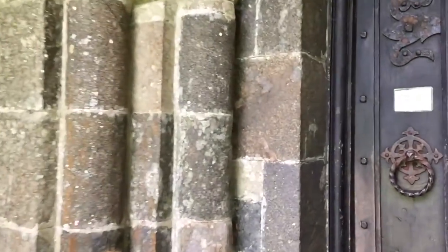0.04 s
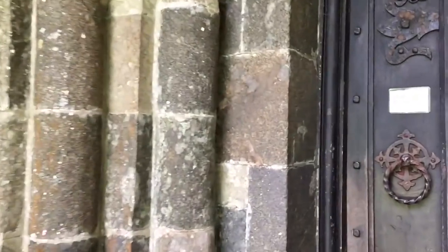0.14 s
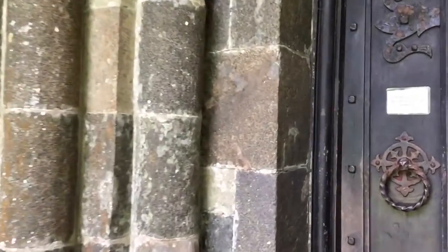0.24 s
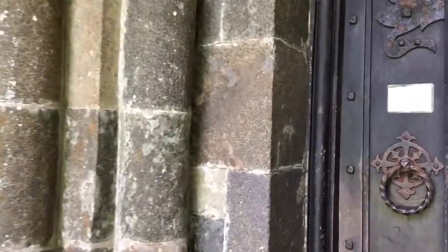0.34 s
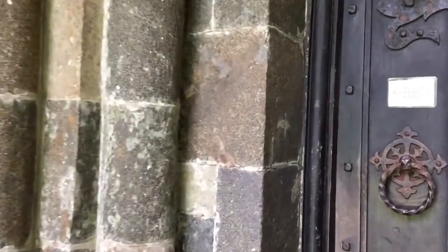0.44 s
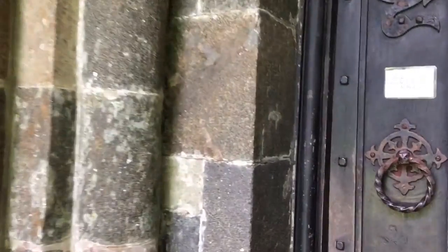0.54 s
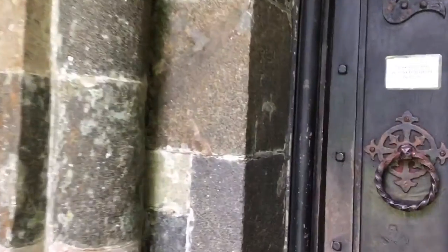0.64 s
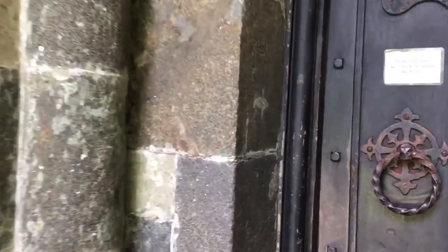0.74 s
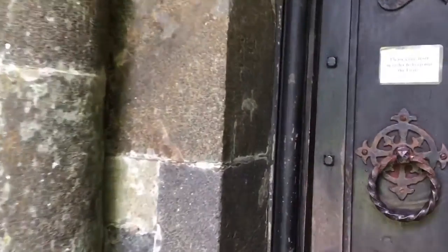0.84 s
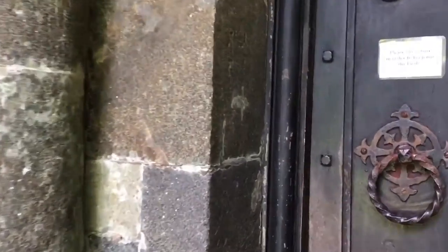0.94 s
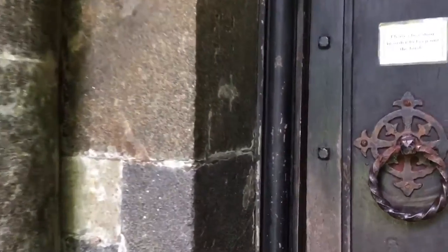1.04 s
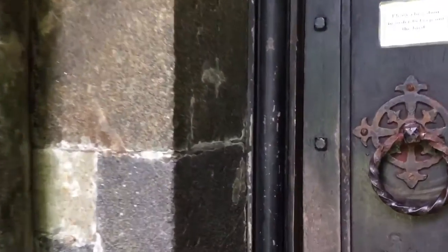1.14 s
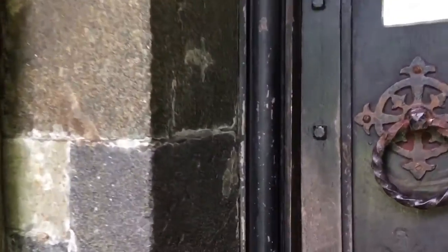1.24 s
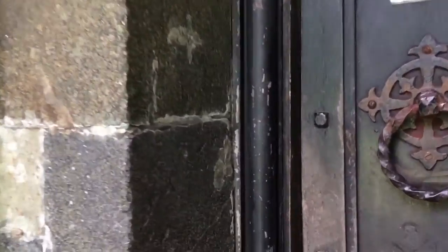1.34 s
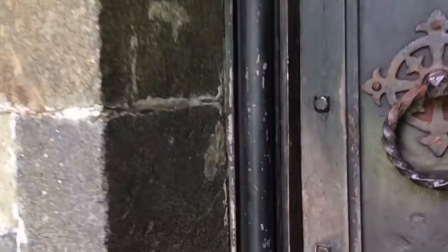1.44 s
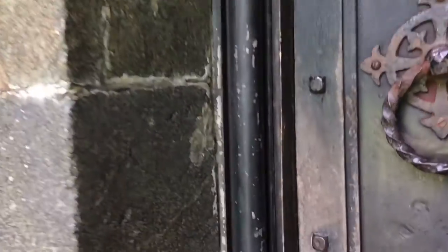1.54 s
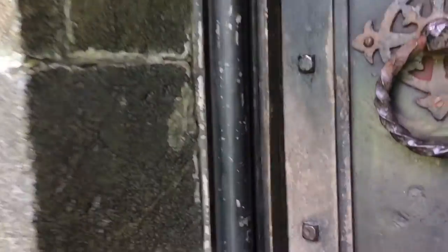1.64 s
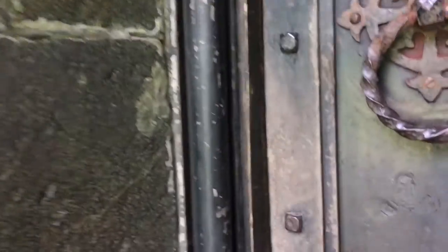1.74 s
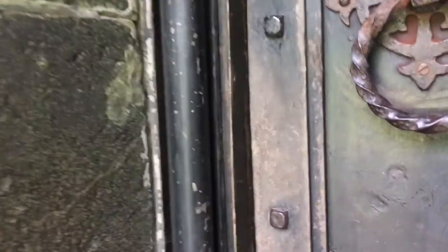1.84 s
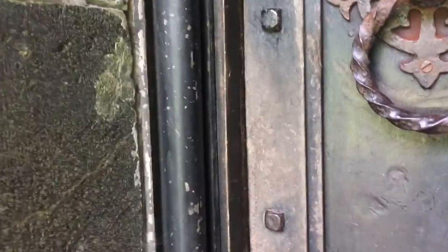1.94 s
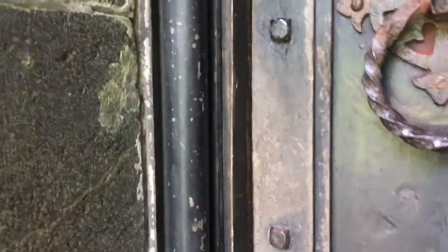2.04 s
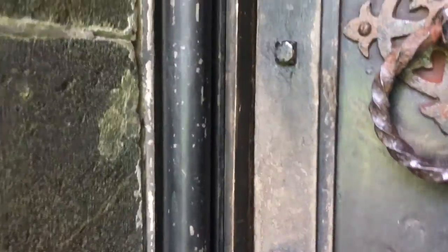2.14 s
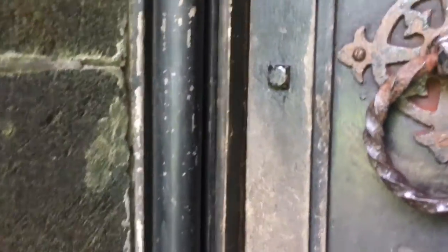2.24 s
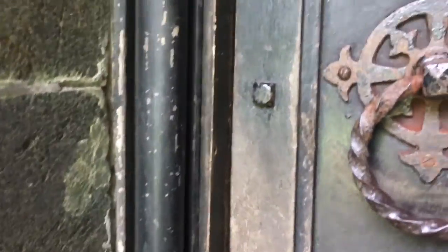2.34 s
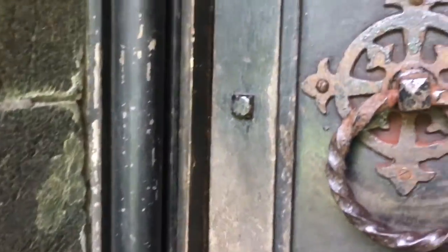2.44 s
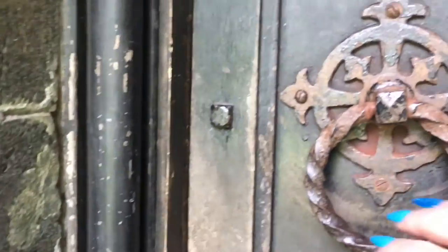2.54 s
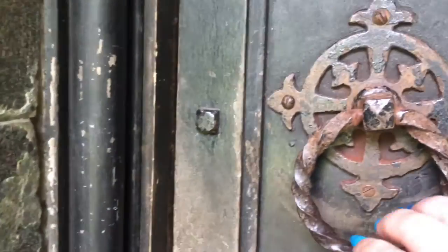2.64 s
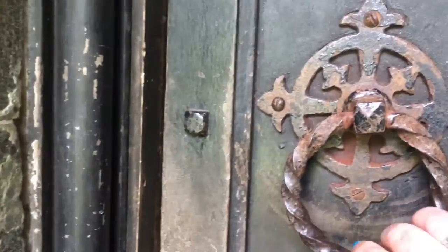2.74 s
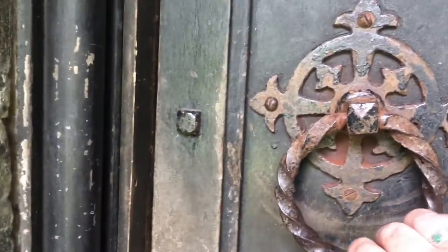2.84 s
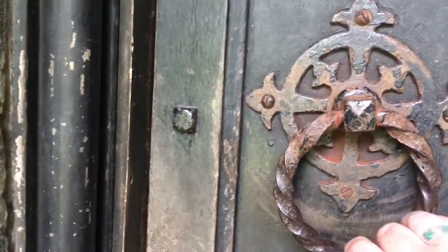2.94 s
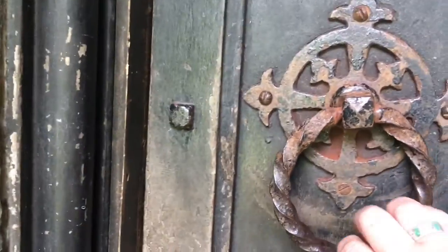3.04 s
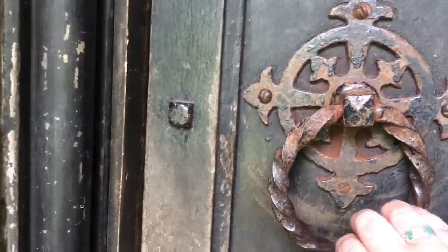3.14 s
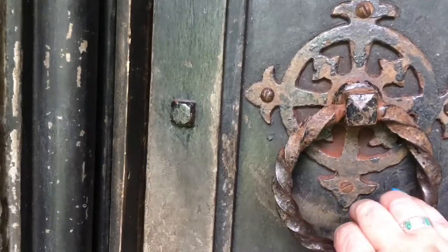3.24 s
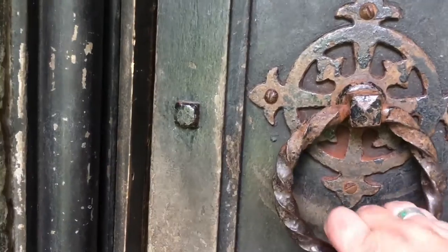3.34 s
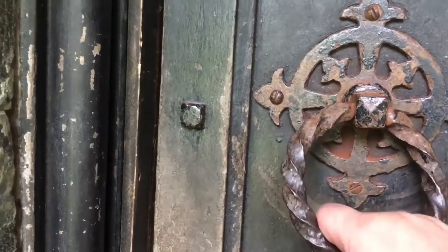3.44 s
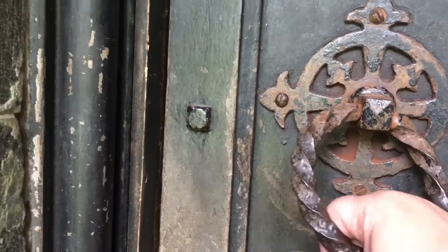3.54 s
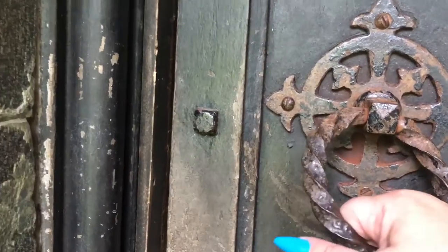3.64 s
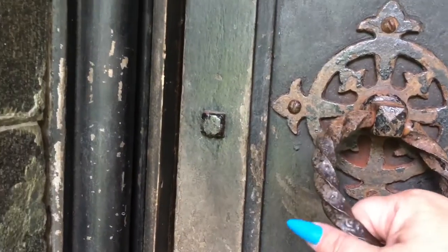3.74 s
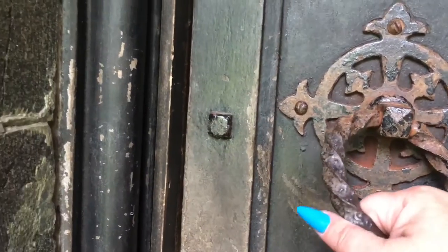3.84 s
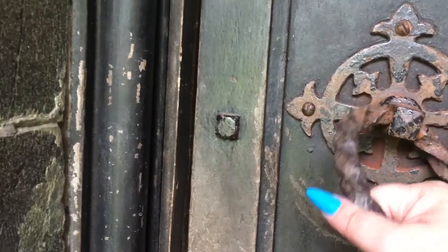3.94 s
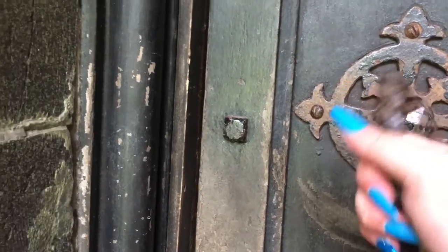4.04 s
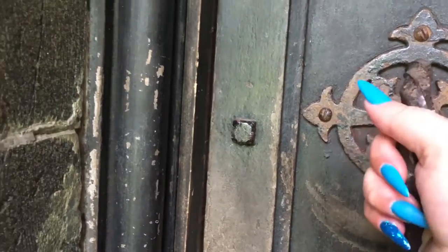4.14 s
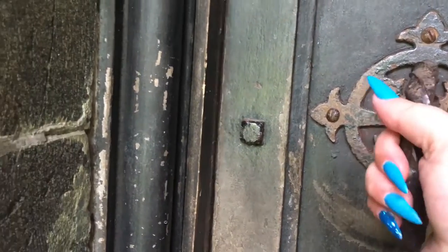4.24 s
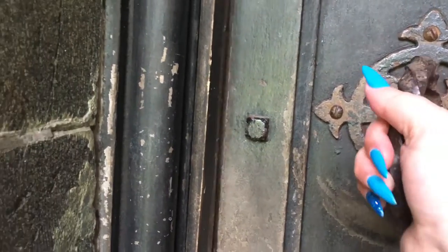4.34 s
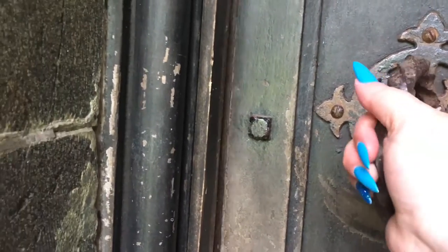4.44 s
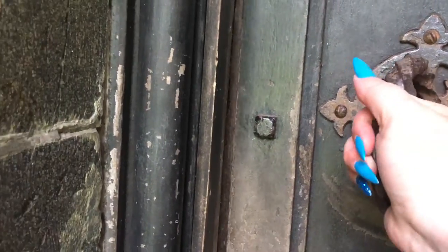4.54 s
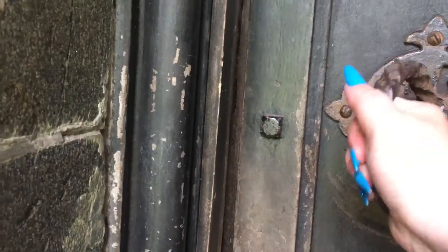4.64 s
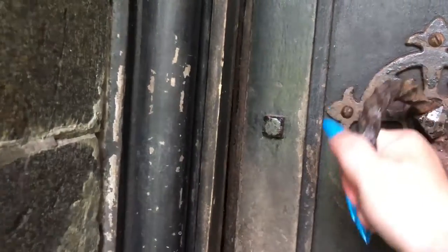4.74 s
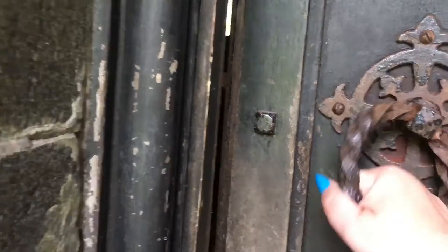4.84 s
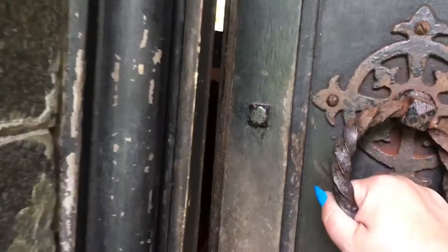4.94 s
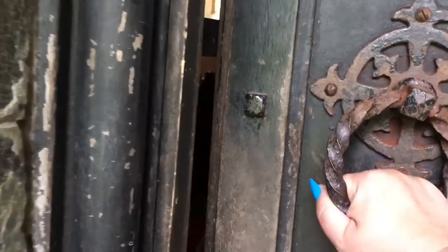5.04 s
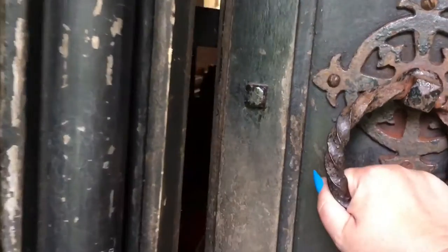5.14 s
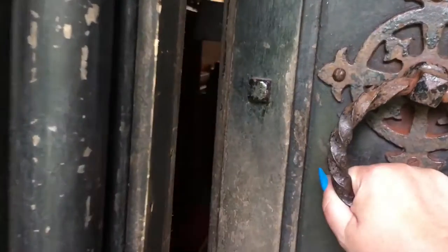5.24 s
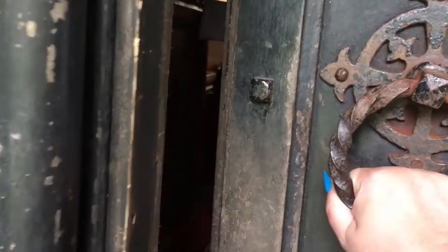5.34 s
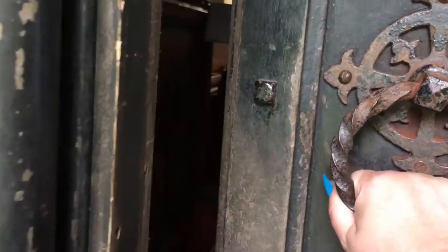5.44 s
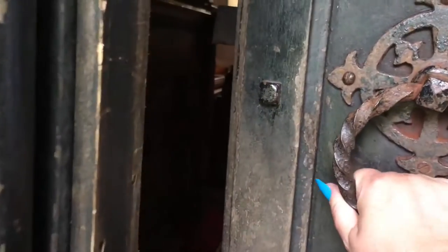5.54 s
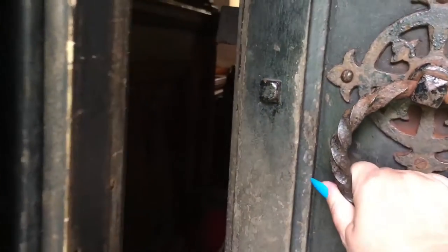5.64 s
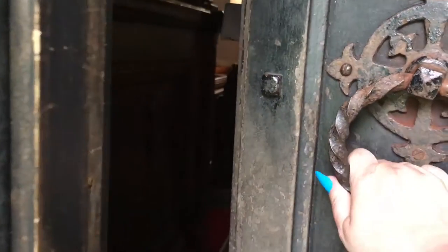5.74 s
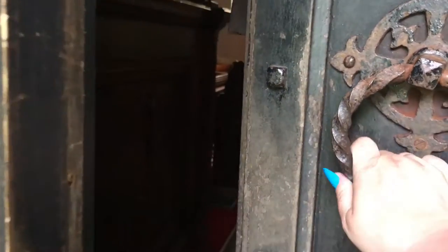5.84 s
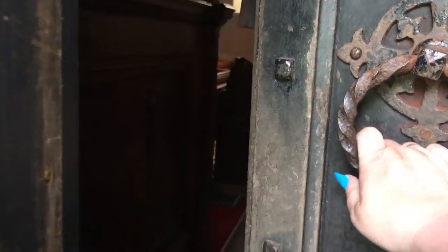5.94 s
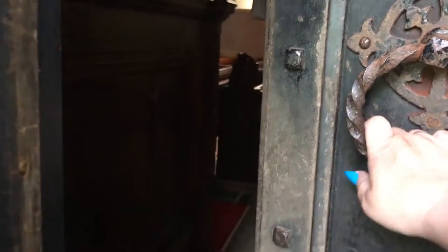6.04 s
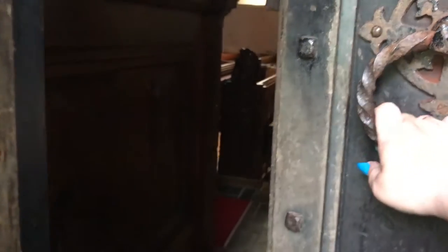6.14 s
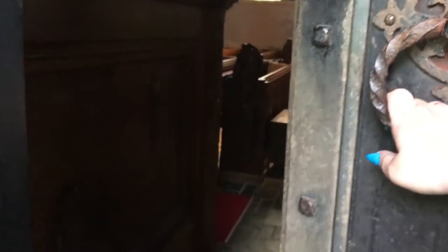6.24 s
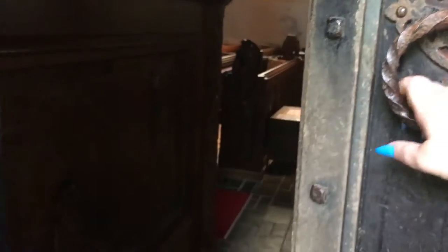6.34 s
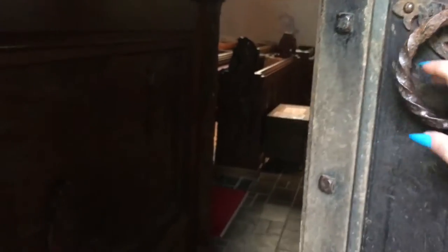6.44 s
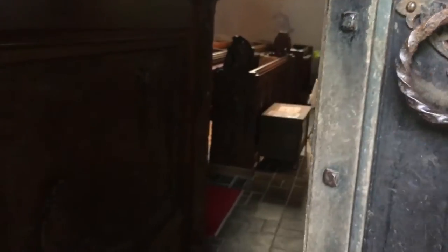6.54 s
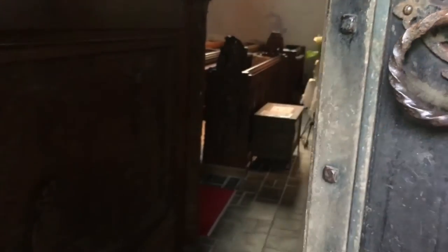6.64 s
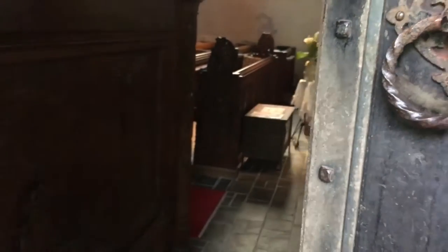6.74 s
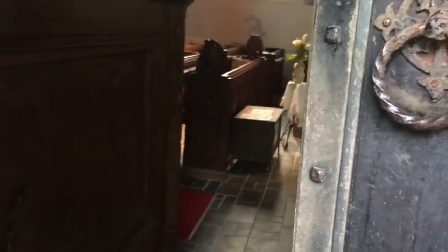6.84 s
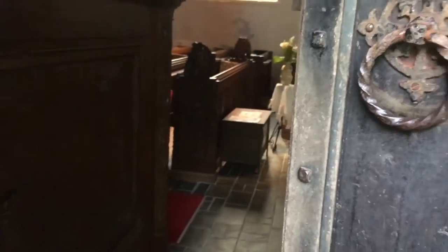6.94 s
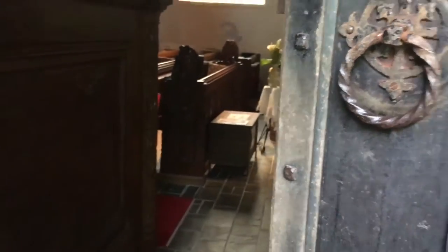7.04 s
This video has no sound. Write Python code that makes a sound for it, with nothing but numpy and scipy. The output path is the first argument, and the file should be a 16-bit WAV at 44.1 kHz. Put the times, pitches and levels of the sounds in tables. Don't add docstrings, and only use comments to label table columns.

```python
import sys
import numpy as np
from scipy import signal
from scipy.fft import rfft, irfft
from scipy.io import wavfile
from scipy.ndimage import uniform_filter1d

SR = 44100
rng = np.random.default_rng(int(sys.argv[2]) if len(sys.argv) > 2 else 0)


def generate_wav(signal):
    frames = np.transpose(np.atleast_2d(signal))
    scaled = np.clip(frames, -1, 1) * 32767
    pcm = np.round(scaled).astype(np.int16)
    wavfile.write(sys.argv[1], SR, pcm)


def elevation(decibels):
    levels = np.asarray(decibels, float)
    return 10 ** (levels / 20)


N = 312669


def rms_one(x):
    return x / np.sqrt(np.mean(x ** 2) + 1e-20)


def at_hz(points, hz):
    table_hz, values = np.transpose(points)
    return np.interp(np.log(hz), np.log(table_hz), values)


def band(x, low_hz, high_hz):
    return signal.sosfilt(signal.butter(2, [low_hz, high_hz], "band", fs=SR, output="sos"), x)


def add(out, start_s, sound):
    i = round(start_s * SR)
    out[i:i + len(sound)] += sound[:N - i]


def sine(hz):
    return np.sin(2 * np.pi * np.cumsum(hz, axis=-1) / SR)


def tail(x, t60_s, cut_hz):
    t = np.arange(round(SR * 0.8)) / SR
    onset = np.minimum(t / 0.016, 1)
    echoes = band(rng.standard_normal(len(t)), 80, cut_hz) * elevation(-60 * t / t60_s) * onset
    return signal.fftconvolve(x, echoes / np.sqrt(np.sum(echoes ** 2)))[:N]


def swells():
    # t/s, length/s, f/Hz, level/dB
    hums = [(0, 0.069, 18.6, -40), (0.101, 0.27, 48, -54), (0.602, 0.35, 28, -48),
            (1.098, 0.29, 25.6, -44.5), (1.2, 0.24, 51, -64), (1.497, 0.28, 27.5, -50),
            (1.8, 0.6, 52, -48.5), (2.349, 0.42, 61, -58), (2.496, 0.44, 29.5, -52.5),
            (2.649, 0.55, 55, -54.5), (3.35, 0.44, 56, -56.5), (3.498, 0.2, 26, -48.5),
            (4.015, 0.055, 12, -29), (4.04, 0.41, 48, -41.5), (4.214, 0.177, 25.2, -43),
            (4.12, 0.29, 140, -61), (1.781, 0.17, 72, -58), (4.599, 0.26, 24, -45.5),
            (4.851, 0.49, 49, -57), (4.951, 0.49, 24.7, -46), (5.551, 1.12, 38.7, -53),
            (6.599, 0.38, 53.6, -55.5)]
    wobble_share = 0.12
    out = np.zeros(N)
    for start_s, length_s, hz, db in hums:
        t = np.arange(round(length_s * SR)) / SR
        waver = rms_one(band(rng.standard_normal(3 * SR), 1, 8)[SR:])[:len(t)]
        swell = np.sin(np.pi * t / length_s) ** 2
        add(out, start_s, elevation(db + 3) * swell * sine(hz * (1 + wobble_share * waver)))
    return out


def outdoors():
    rumble_db = (-52, -60.5, -69)
    # t/s, far traffic level/dB, far bird chorus level/dB
    air_levels = [(0, -68.5, -76.5), (.6, -70, -70.5), (1.0, -70, -72), (1.2, -70.5, -68.5),
                  (1.5, -69.5, -69), (1.7, -70, -74.5), (2.1, -71, -82), (3, -70.5, -91), (4, -69.5, -87),
                  (4.6, -67.5, -77.5), (5.2, -66.5, -78), (5.7, -73.5, -76.5), (6.301, -70.5, -74.5),
                  (6.8, -71.5, -73.5), (7.09, -72.5, -76)]
    # f/Hz, density/(dB per Hz)
    air_colour = [(59, -31.5), (100, -6.5), (146, -7.5), (314, -13), (1050, -17.5), (1820, -21),
                  (2020, -24.5), (3510, -30.5), (14800, -36), (15800, -36)]
    t = np.arange(N) / SR
    out = swells()
    for (low_hz, high_hz), db in zip([(12, 35), (41, 58.4), (60, 100)], rumble_db):
        noise = rng.standard_normal(N + SR)
        hum = rms_one(band(band(noise, low_hz, high_hz), low_hz, high_hz)[SR:])
        swing = np.sqrt(np.abs(uniform_filter1d(hum ** 2, size=2000)))
        out += elevation(db) * rms_one(hum / (swing + 0.5))
    colour_db = at_hz(air_colour, np.linspace(1, SR / 2, 2 ** 18 + 1))
    hiss = irfft(rfft(rng.standard_normal(2 ** 19)) * elevation(colour_db))[:N]
    air_s, traffic_db, chorus_db = np.transpose(air_levels)
    traffic = signal.sosfilt(signal.butter(2, 2200, fs=SR, output="sos"), hiss)
    air = elevation(np.interp(t, air_s, traffic_db)) * traffic + elevation(-70) * (hiss - traffic)
    chorus = rms_one(band(rng.standard_normal(N), 2300, 4200))
    return out + air / np.std(band(hiss, 180, 1500)) + elevation(np.interp(t, air_s, chorus_db)) * chorus


def songs():
    # t/s, level/dB
    trill_notes = [
        (.05, -83),
        (.15, -82),
        (0.28, -67),
        (.395, -66),
        (0.486, -63.5),
        (.626, -66),
        (0.751, -66),
        (.879, -62),
    ]
    # t/s, length/s, top f/Hz, end f/Hz, level/dB
    chirps = [(1.5, 0.09, 4100, 2700, -74), (6.27, .13, 4600, 2800, -68), (6.445, 0.094, 4300, 2800, -65),
              (6.626, 0.08, 3400, 2700, -64.5), (6.764, .085, 4900, 2950, -65.5),
              (7.004, 0.045, 4300, 3900, -69), (6.27, .07, 5000, 4200, -75), (6.44, .06, 4800, 4000, -72),
              (6.62, .08, 4500, 3900, -76), (6.79, .07, 3900, 2900, -72), (6.5, .07, 3300, 2600, -72),
              (7.01, .06, 3500, 2600, -72)]
    # t/s, length/s, start f/Hz, end f/Hz, level/dB
    far_notes = [(1.081, 0.061, 3100, 3290, -63), (1.1, .14, 3630, 3630, -73),
                 (0.931, 0.21, 1865, 1796, -71.5), (1.252, 0.091, 4460, 4480, -69),
                 (1.46, 0.039, 2830, 4190, -64), (1.521, 0.11, 2900, 2104, -69),
                 (4.369, 0.24, 3260, 3357, -74.5), (4.894, 0.44, 7980, 7400, -76),
                 (5.22, 0.077, 3340, 3180, -73), (5.44, 0.091, 3710, 3490, -72),
                 (5.556, .3, 3540, 3380, -70), (5.858, 0.19, 3266, 3176, -69.5),
                 (6.08, 0.19, 3315, 3320, -71), (6.6, 0.089, 4700, 4120, -76),
                 (6.68, 0.097, 1410, 1502, -74), (6.83, 0.12, 1384, 1560, -74.5),
                 (6.2, .06, 3690, 3510, -70.5), (5.87, .3, 3750, 3650, -75), (5.9, .3, 2900, 2850, -75),
                 (1.1, .16, 3150, 3200, -71), (5.72, .15, 1400, 1450, -76), (5.9, .2, 1600, 1550, -75),
                 (6.22, .08, 1500, 1450, -75), (.5, .5, 3500, 3400, -76), (.6, .45, 2850, 2800, -76),
                 (1.13, .12, 3950, 3900, -73)]
    trill_hz, note_s, grows_s_per_s, slide_hz_per_s = 3150, 0.0354, 0.0413, 657
    clear_share = 0.55
    trill = []
    for start_s, db in trill_notes:
        start_hz = trill_hz + 0.442 * slide_hz_per_s * start_s
        end_hz = trill_hz - 0.417 * slide_hz_per_s * start_s
        trill.append((start_s, note_s + grows_s_per_s * start_s, start_hz, end_hz, db))
    return [(*note, clear_share) for note in trill + chirps] + [(*note, 1) for note in far_notes]


def whistles():
    # t/s, f/Hz, level/dB
    pips = [(.36, 4520, -72), (.46, 4580, -72), (.606, 4420, -74), (.745, 4360, -67.5), (.875, 4345, -70),
            (1.03, 4330, -79), (5.189, 4340, -77), (5.295, 4370, -71.5), (5.391, 4370, -64),
            (5.492, 4360, -62.5), (5.6, 4330, -66), (5.68, 4250, -66.5), (5.783, 4336, -64),
            (5.912, 4315, -73)]
    t60_s, wobble_hz, sag_hz_per_s = 0.2, 22, 250
    out, t = np.zeros(N), np.arange(8000) / SR
    for start_s, hz, db in pips:
        wobble, flutter = rms_one(band(rng.standard_normal((2, SR // 2)), 12.7, 150))[:, -len(t):]
        pitch_hz = hz - sag_hz_per_s * t + wobble_hz * wobble
        envelope = elevation(db - 60 * t / t60_s) * np.minimum(t / 0.0044, 1)
        add(out, start_s, envelope * (1 + 0.22 * flutter) * sine(pitch_hz))
    return out


def birds():
    warble_of_pitch, warble_of_slide = 0.065, 0.17
    trees_t60_s = 0.43
    out = whistles()
    for start_s, length_s, start_hz, end_hz, db, share in songs():
        slide_hz = end_hz - start_hz
        depth_hz = share * (warble_of_pitch * end_hz + warble_of_slide * abs(slide_hz))
        t = np.arange(round(length_s * SR)) / SR
        warble = rms_one(band(rng.standard_normal((2, SR)), 39.2, 200))[:, :len(t)]
        throb = elevation(3 * rms_one(band(rng.standard_normal(SR), 10, 40))[-len(t):])
        split = [[0.6], [-0.6]]
        hz = start_hz + slide_hz * t / length_s + depth_hz * (0.4 * warble + split)
        envelope = np.sin(np.pi * t / length_s) ** 0.086
        add(out, start_s, elevation(db - 5) * throb * envelope * sine(hz).sum(0))
    return out + tail(out, trees_t60_s, 13000) * elevation(-4)


def grit():
    # t/s, peak level/dB, below 900 Hz re/dB, 2.3-8.9 kHz re/dB, half length/ms
    scuffs = [(0.0, -45.5, 3, -8, 9.3), (0.141, -53.5, -30, -13, 25), (0.496, -51.5, -10, 0, 28),
              (0.5294, -61, -5, -18, 100), (0.618, -52, -22, -26, 80), (0.769, -48, -7, -12, 34),
              (0.9534, -55, -25, -10, 21), (1.148, -51, 1.5, -15, 36), (1.248, -46, -15, 0, 51),
              (1.2935, -55.5, -7, -34, 61), (1.393, -54.5, -35, 0, 57), (1.736, -44, 5.5, -16, 18.7),
              (1.763, -42.5, -7, -9, 27), (1.819, -58, 3.5, -8, 71), (1.9265, -56.5, 2.5, -8, 80),
              (2.0074, -50.5, 3, -25, 20.5), (2.0294, -63, -16, -17, 47), (5.0973, -46.5, -20, -7, 44),
              (5.128, -50.5, -17, -17.5, 23), (6.379, -60, 5, -17, 35)]
    out = np.zeros(N)
    cracks = rng.standard_normal(N) * elevation(2 * rng.exponential(1, N))
    for start_s, db, low_db, top_db, length_ms in scuffs:
        phase = np.linspace(0, 1, int(length_ms * SR / 500))
        swell = np.minimum(phase / 0.025, 1) * elevation(-26 * phase ** 1.7)
        piece = cracks[round(start_s * SR):][:len(phase)]
        low = elevation(low_db + 3.5) * rms_one(band(piece, 140, 780))
        middle = rms_one(band(piece, 510, 3340))
        top = elevation(top_db - 0.5) * rms_one(band(piece, 2300, 8900))
        add(out, start_s, elevation(db - 11.5) * swell * (low + middle + top))
    return out


def thuds():
    # t/s, peak level/dB, f/Hz, t60/s
    pushes = [(0.241, -72, 96.9, 0.1), (0.533, -47, 125, 0.064), (0.953, -57, 259, 0.16),
              (1.157, -49, 198, 0.098), (1.737, -49, 134, 0.12), (2.005, -55, 91.5, 0.13),
              (3.141, -32.5, 70, 0.038), (3.409, -41.5, 238, 0.24), (3.491, -40, 257, 0.066),
              (3.524, -43.5, 287, 0.12), (3.814, -55, 227, 0.25), (3.962, -29, 187, 0.23),
              (4.008, -38, 212, 0.18), (4.068, -34, 270, 0.2), (4.542, -44, 189, 0.081),
              (4.6588, -32.5, 180, 0.1), (4.797, -45.5, 154, 0.085), (4.847, -44, 232, 0.08),
              (5.316, -43.5, 196, 0.11), (6.413, -47.5, 303, 0.21), (6.74, -54.5, 248, 0.13)]
    out, t = np.zeros(N), np.arange(9000) / SR
    for start_s, db, hz, t60_s in pushes:
        modes = [(1, 1), (0.31, 1.45), (0.28, 0.8)]
        swing = sum(gain * np.sin(2 * np.pi * ratio * hz * t) for gain, ratio in modes)
        add(out, start_s, elevation(db - 3.5 - 60 * t / t60_s) * swing)
    return out


def ticks():
    # t/s, peak level/dB, mode f/Hz, mode f/Hz
    hard_taps = [(0.3566, -41.5, 2360, 4540), (1.765, -35, 4960, 7060), (2.811, -44.5, 3140, 4600),
                 (2.8853, -55, 2850, 4280), (3.116, -57, 2800, 5270), (3.3595, -55, 2660, 3830),
                 (3.414, -48, 2110, 2900), (3.424, -38, 2770, 4460), (3.493, -58, 4830, 6500),
                 (3.518, -46, 2000, 2620), (3.957, -28, 2500, 3300), (3.965, -36, 3180, 8500),
                 (3.9886, -24, 3140, 4880), (4.009, -30, 3300, 1620), (4.0665, -6, 1704, 4330),
                 (4.067, -15, 2600, 3380), (4.110, -30, 3920, 4600), (4.190, -48, 5900, 8004),
                 (4.205, -55, 9000, 12000), (4.251, -43, 4400, 6600), (4.278, -50, 3000, 3500),
                 (4.287, -39.5, 2500, 5020), (4.658, -50, 3860, 6600), (4.672, -40, 2300, 2900),
                 (4.797, -48.5, 3360, 4150), (4.8486, -28, 2220, 3100), (4.879, -31, 3590, 3900),
                 (5.2644, -56, 5500, 11000), (4.886, -39, 3300, 4200), (3.411, -57, 8000, 12000),
                 (4.849, -53, 11000, 14000), (4.0396, -43, 2360, 2100), (4.258, -54, 12000, 15000),
                 (6.3395, -52, 1500, 3600)]
    # t/s, peak level/dB, f/Hz
    snaps = [(3.141, -33.5, 267), (3.141, -33, 1900), (3.141, -30, 7300), (3.9652, -14, 524),
             (3.9693, -20, 700), (4.0672, -10, 800), (4.0645, -13, 450), (4.0652, -9, 1650),
             (4.0672, -9, 1700), (4.0716, -12, 450), (4.8808, -16.5, 1600)]
    tick_t60_s, tick_rise_s = 0.014, 0.00058
    snap_t60_cycles, snap_rise_s = 3.5, 0.00015
    out, t = np.zeros(N), np.arange(1500) / SR
    for start_s, db, *modes_hz in hard_taps:
        pair = sum(np.sin(2 * np.pi * hz * t) for hz in modes_hz)
        grain = sum(band(rng.standard_normal(len(t)), 0.7 * hz, 1.263 * hz) for hz in modes_hz)
        envelope = elevation(db - 9 - 60 * t / tick_t60_s) * (1 - np.exp(-t / tick_rise_s))
        add(out, start_s, envelope * (pair + 3 * grain))
    for start_s, db, hz in snaps:
        envelope = elevation(db - 60 * t * hz / snap_t60_cycles) * np.minimum(t / snap_rise_s, 1)
        add(out, start_s, envelope * np.sin(2 * np.pi * hz * t))
    return out


def scrapes():
    # t/s, length/s, level/dB, low f/Hz, high f/Hz
    drags = [
        (3.99, .03, -34, 350, 1400),
        (4.035, .03, -41, 350, 2400),
        (4.825, .024, -69, 3000, 11000),
        (5.105, .05, -61, 1300, 7000),
        (6.39, .03, -56, 300, 1800),
        (3.41, .016, -50, 300, 1800),
        (4.652, .02, -54, 400, 2500),
    ]
    grows_db, grain_db = 6, 3
    out = np.zeros(N)
    for start_s, length_s, db, low_hz, high_hz in drags:
        slips = rng.standard_normal(4000) * elevation(grain_db * rng.exponential(1, 4000))
        rasp = rms_one(band(band(slips, low_hz, high_hz), low_hz, high_hz))
        phase = np.linspace(0, 1, round(length_s * SR))
        swell = np.sin(np.pi * phase) ** 0.3 * elevation(grows_db * (phase - 1))
        add(out, start_s, elevation(db) * swell * rasp[:len(phase)])
    return out


def clangs():
    # t/s, peak level/dB, f/Hz, t60/ms
    iron_notes = [(2.812, -61, 8650, 60), (2.815, -62, 1000, 80), (3.426, -35, 1052, 83), (3.425, -44, 2713, 85),
                  (3.434, -41, 1400, 76), (3.425, -53, 4500, 66), (3.429, -62, 7900, 80), (3.967, -26, 1330, 70),
                  (3.964, -32, 640, 80), (3.962, -32, 480, 87), (3.97, -38, 3200, 40), (3.990, -35, 4900, 30),
                  (3.991, -43, 6690, 25), (4.066, -9.5, 705, 65), (4.067, -11.5, 810, 75),
                  (4.0655, -11.5, 1670, 55), (4.065, -18, 445, 50), (4.067, -19, 563, 90),
                  (4.068, -18.5, 940, 79), (4.068, -23, 1400, 60), (4.07, -30, 1480, 70), (4.07, -23, 1600, 69),
                  (4.0655, -21, 3020, 40), (4.076, -28, 4370, 60), (4.671, -32, 790, 60), (4.8, -45, 1100, 60),
                  (4.848, -35, 764, 69), (4.85, -52, 6600, 63), (4.88, -26, 594, 93), (4.8795, -22, 1580, 45),
                  (4.877, -25, 450, 60), (4.888, -25, 700, 85), (4.882, -30.5, 996, 106), (4.879, -26, 1900, 68),
                  (4.88, -26, 2430, 41), (4.879, -28.5, 2600, 61), (4.881, -32, 3200, 40),
                  (4.89, -55.5, 5300, 140),
                  (3.958, -32, 3000, 25), (3.974, -31, 1150, 60), (3.9887, -28, 3030, 25),
                (3.995, -33, 1373, 100), (3.996, -34, 781, 150), (4.008, -35, 431, 120),
                (4.009, -39, 3359, 30), (4.0, -34, 1130, 70), (4.043, -34, 781, 100),
                (4.044, -39, 1400, 70), (4.075, -24, 1960, 90), (4.078, -25, 1130, 110),
                (4.1, -29, 1502, 90), (4.105, -31, 398, 200), (4.1, -31, 1949, 90), (4.105, -41, 4737, 40),
                (4.0655, -24, 6374, 35), (4.067, -27, 5582, 35), (4.067, -23, 3850, 35),
                (4.66, -45, 2000, 40), (4.849, -34, 2500, 30), (4.851, -42, 1400, 50),
                (4.85, -48, 5800, 40), (4.908, -40, 398, 80), (4.915, -41, 1200, 70)]
    rise_s, chatter_share, chatter_top_hz = 0.0015, 0.45, 300
    out, t = np.zeros(N), np.arange(9000) / SR
    notes = iron_notes
    shakes = rms_one(band(rng.standard_normal((len(notes), len(t))), 40, chatter_top_hz))
    for (start_s, db, hz, t60_ms), shake in zip(notes, shakes):
        envelope = elevation(db - 1.5 - 60000 * t / t60_ms) * (1 - np.exp(-t / rise_s))
        add(out, start_s, envelope * (1 + chatter_share * shake) * np.sin(2 * np.pi * hz * t))
    return out


def door():
    # t/s, peak level/dB, oak <900 Hz re/dB, top >3 kHz re/dB, ring-on/(0-1.5)
    knocks = [(3.4093, -45.5, 1, -20, 1), (3.4253, -33, -5, -18, 0.8), (3.4942, -51, 7, -21, 1),
              (3.8174, -63.5, 2.5, -11, 1), (3.9572, -28, -4, -14, 1), (3.9641, -23.5, -1, -24, 0.7),
              (3.988, -29, -2, -18, 0.65), (4.0082, -25.5, -3, -17, 1), (4.0644, -8.5, -6.5, -5, .47),
              (4.1074, -33, 0, -22, 0.6), (4.1894, -42.5, -16.5, -5, 0.67), (4.25, -41, -8, 0, 0.5),
              (4.2875, -45, -29, -4, 0.56)]
    swing_knocks = [(4.5407, -66, 8, -10, 0.62), (4.659, -40.5, -9, -18, 0.86), (4.6712, -47, 8, -20, 0.4),
                    (4.796, -35, -3.5, -32, 0.7), (4.8485, -32, -3, -13, 0.6), (4.878, -19, -8, -22, 0.7),
                    (4.8906, -36, -2, -18, 0.9), (4.915, -38, -8, -24, 0.85), (5.3204, -43, 5, -18, 0.4),
                    (6.4145, -46, -5.5, -34, 0.53), (6.433, -48.5, -2, -19.5, 0.32),
                    (6.7409, -61, -5, -10, .65)]
    # t/s, peak level/dB, oak re/dB, top re/dB
    light_taps = [
        (.5277, -50, -9, -12),
        (.636, -46, -18, -7),
        (1.1573, -48, -22, -32),
        (1.2924, -46.5, -28, -18),
        (1.395, -49, -33, -35),
        (3.1412, -53.5, 1, -20),
        (3.517, -45.5, 11, -28),
        (4.4662, -56, -11, -12),
        (6.339, -48.5, -17, -4.5),
    ]
    # f/Hz, level/dB, t60/s
    latch_modes = [(390, -19, 0.2), (543.6, -6, 0.21), (668, -7, 0.38), (693, -7, 0.17), (790, -3.5, 0.1),
                   (960, -15.5, 0.059), (1515, -13.5, 0.22), (1534, -5, 0.16), (2140, -14, 0.16),
                   (2070, -21, 0.23), (2375, -20, 0.14), (2920, -19, 0.21), (3630, -6.5, 0.048),
                   (3850, -34, 0.64), (3900, -30.5, 0.44), (4094, -18, 0.13), (4420, -21, 0.14),
                   (4474, -25.5, 0.18), (4450, -29, 0.19), (4714, -34, 0.16), (4970, -27.5, 0.16),
                   (5870, -37, 0.092), (6600, -31, 0.13), (6800, -22.5, 0.23)]
    # f/Hz, density/(dB per Hz)
    plank_colour = [(59, -53), (100, -21), (438, -3), (614, -8), (682, -2), (808, -8.5), (1310, -5.5),
                    (1690, -9.5), (2370, -11), (4460, -16), (15500, -53.5)]
    # f/Hz, t60/s
    plank_t60 = [(120, 0.93), (500, .2), (2000, 0.3), (6000, 0.17), (14000, 0.18)]
    rattle_ms, tap_ms, tap_ring = 6.3, 1.9, 0.61
    edges_hz = 100 * 2 ** np.arange(0, 7.4, 0.33)
    band_hz = np.sqrt(edges_hz[1:] * edges_hz[:-1])
    out, t = np.zeros(N), np.arange(10000) / SR
    hz, mode_db, t60_s = np.transpose(latch_modes)[:, :, None]
    hits = np.array(knocks + swing_knocks + [(*tap, tap_ring) for tap in light_taps])
    spans_ms = np.full(len(hits), rattle_ms)
    spans_ms[-len(light_taps):] = tap_ms
    ring = hits[:, -1:]

    contacts = np.zeros((len(hits), 900))
    steps = np.linspace(0, 1, 12)
    for row, span_ms in zip(contacts, spans_ms):
        lags = (steps * span_ms * SR / 1000).astype(int)
        row[lags] = np.r_[1.9, rng.standard_normal(11)] * elevation(-6 * steps)
    crack_power = signal.fftconvolve(contacts ** 2, elevation(17.5 - 120 * t / 0.0077)[None], axes=1)
    cracks = np.sqrt(np.abs(crack_power[:, :len(t)]))
    padded = np.pad(contacts, [(0, 0), (0, len(t) - 900)])
    fed = np.sqrt(np.cumsum(padded ** 2, axis=1))
    fed = uniform_filter1d(fed, size=31, origin=15, mode="constant")

    white = rng.standard_normal((len(hits), 2, len(t)))
    planks = []
    for k, (low_hz, high_hz) in enumerate(zip(edges_hz, edges_hz[1:])):
        dying = cracks + fed * elevation(-60 * t / (ring * at_hz(plank_t60, band_hz[k])))
        rows = band(white[:, k % 2] * dying, low_hz, high_hz)
        due = (dying ** 2).sum(1) * 2 * (high_hz - low_hz) / SR
        planks.append(rows * np.sqrt(due / (rows ** 2).sum(1))[:, None])

    for k, (start_s, db, oak_db, top_db, _) in enumerate(hits):
        tilt = [(550, oak_db + 6), (1700, 0.003), (5500, top_db + 7.5), (13000, 0.75 * top_db + 14.5)]
        strength, detune = rng.standard_normal((2, len(hz), 1))
        strength_db = mode_db + at_hz(tilt, hz) + 3 * strength
        pitch_hz = hz * (1 + 0.008 * detune)
        decay_db = 60 * t / (np.minimum(t60_s, 0.075) * ring[k])
        iron = (elevation(strength_db - decay_db) * np.sin(2 * np.pi * pitch_hz * t)).sum(0)
        plank_gains = elevation(at_hz(plank_colour, band_hz) + at_hz(tilt, band_hz))
        wood = sum(gain * rows[k] for gain, rows in zip(plank_gains, planks))
        knock = fed[k] * iron + elevation(20) * wood
        peak = np.abs(band(knock[:2000], 900, 3000)).max()
        add(out, start_s, knock * elevation(db - 2.5) / peak)
    return out


def scene():
    porch_t60_s, porch_db = 0.28, -19
    near = grit() + thuds() + ticks() + scrapes() + clangs() + door()
    porch = elevation(porch_db) * tail(near, porch_t60_s, 10000)
    return (outdoors() + birds() + near + porch)[None]


def roll_off(x):
    return signal.sosfilt(signal.butter(12, 15930, fs=SR, output="sos"), x)


def record(dry):
    mix = signal.sosfilt(signal.cheby2(10, 60, 16700, fs=SR, output="sos"), dry)
    return roll_off(mix)


dry = scene()
out = record(dry)
generate_wav(out)
```